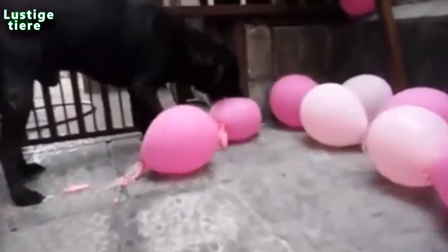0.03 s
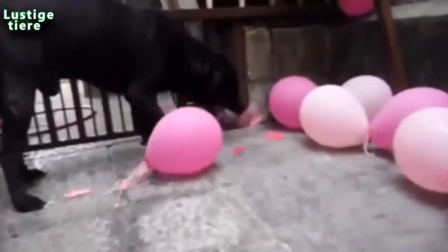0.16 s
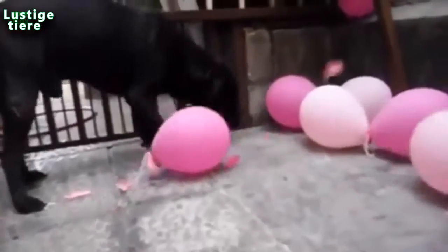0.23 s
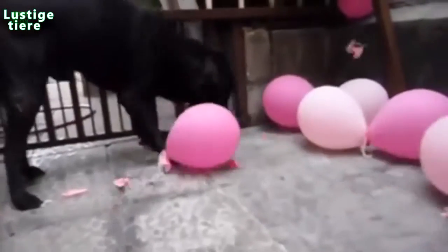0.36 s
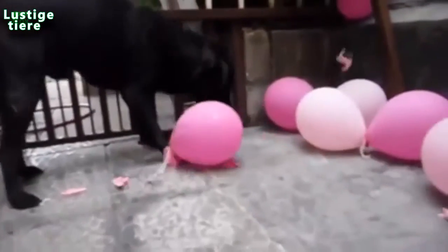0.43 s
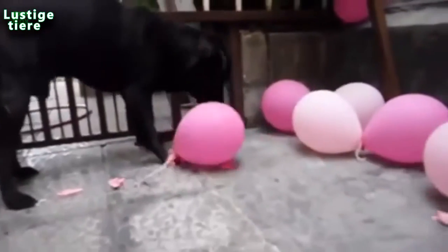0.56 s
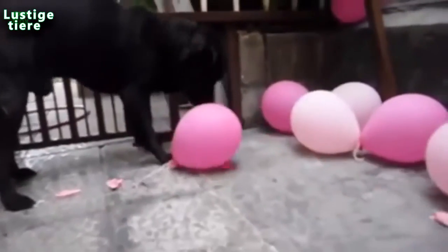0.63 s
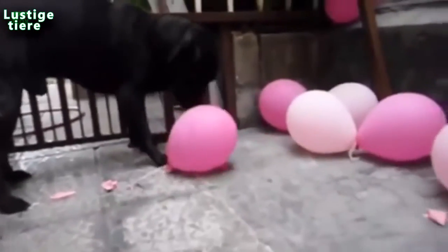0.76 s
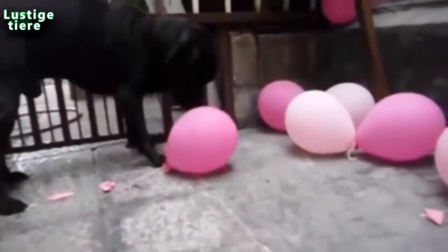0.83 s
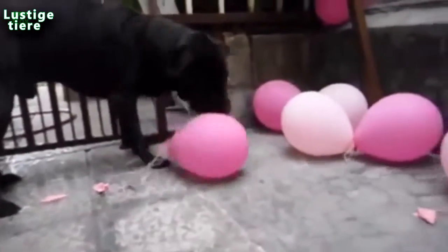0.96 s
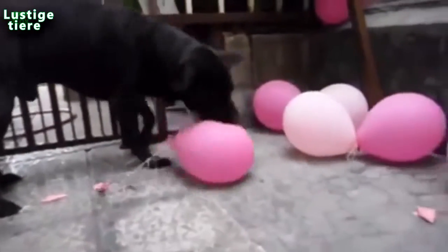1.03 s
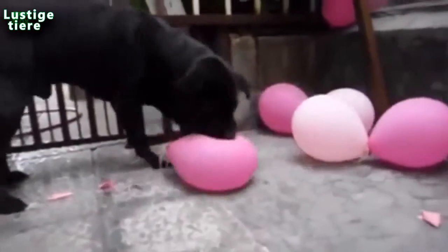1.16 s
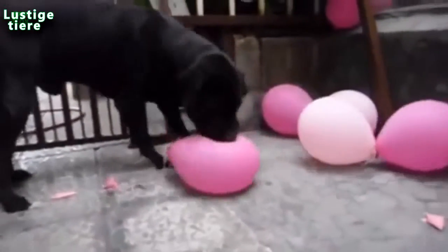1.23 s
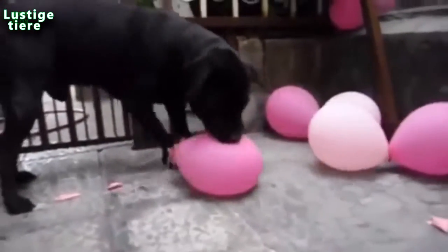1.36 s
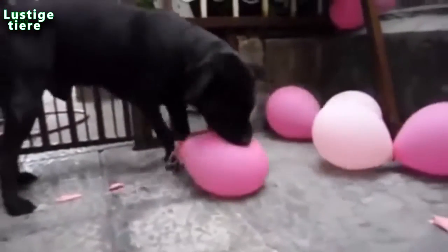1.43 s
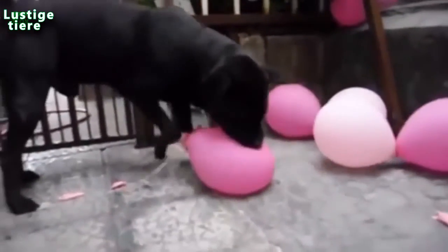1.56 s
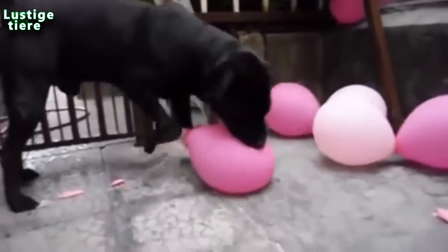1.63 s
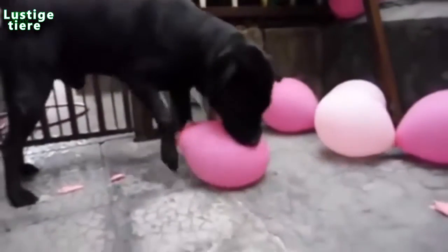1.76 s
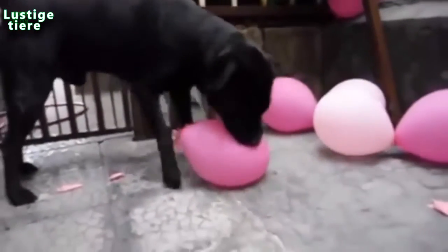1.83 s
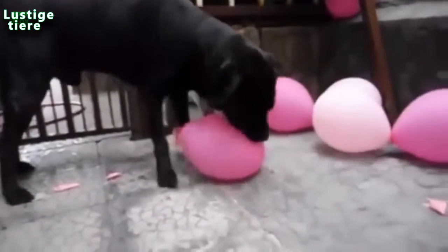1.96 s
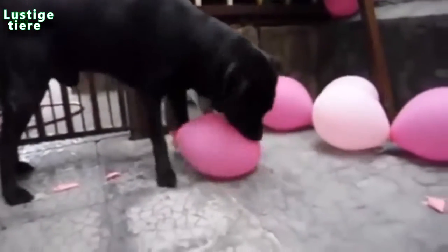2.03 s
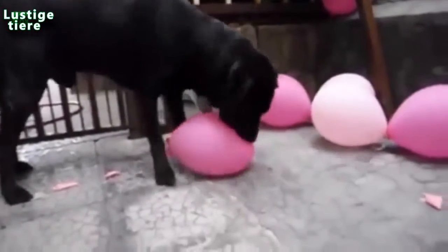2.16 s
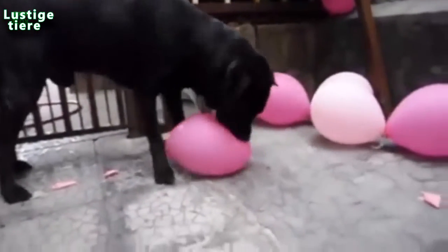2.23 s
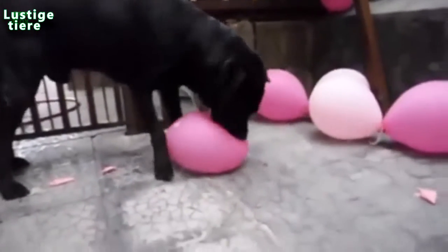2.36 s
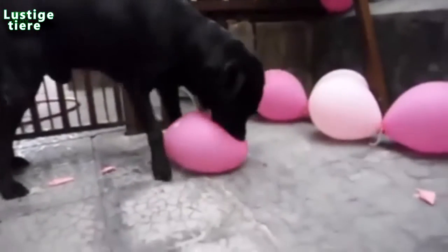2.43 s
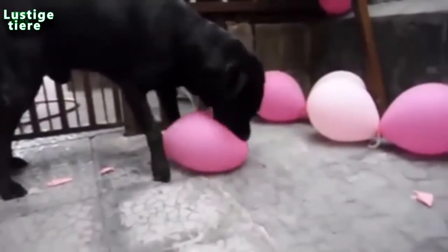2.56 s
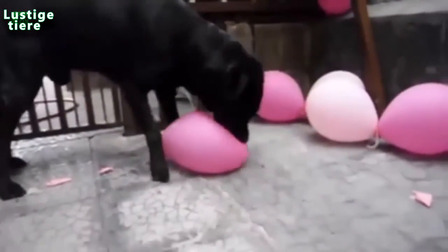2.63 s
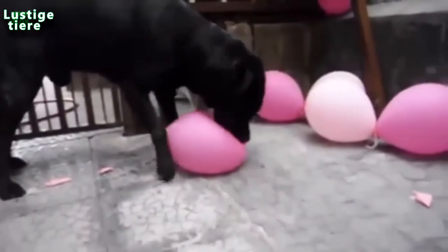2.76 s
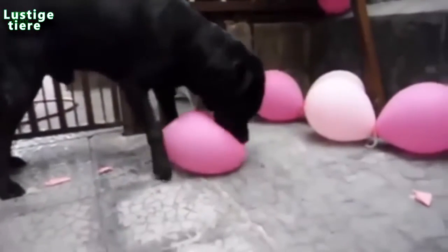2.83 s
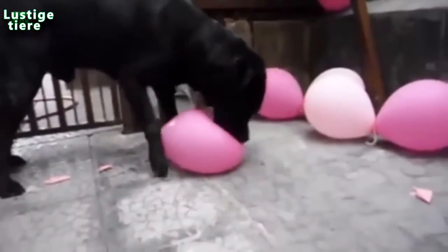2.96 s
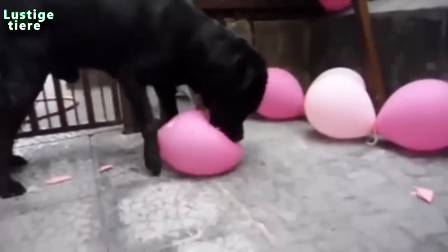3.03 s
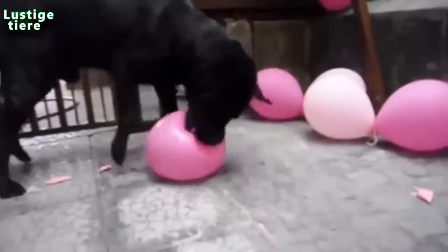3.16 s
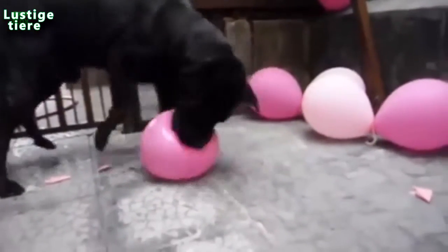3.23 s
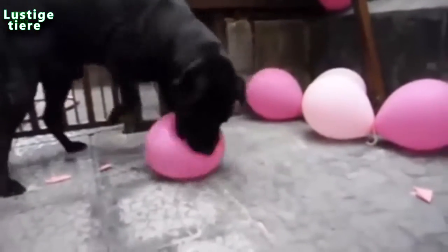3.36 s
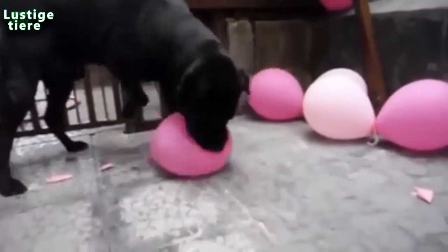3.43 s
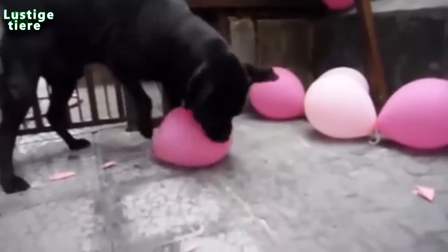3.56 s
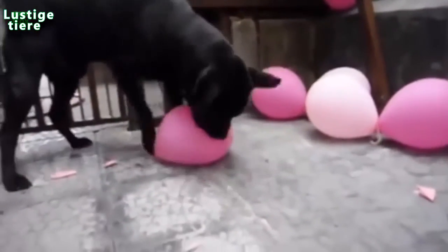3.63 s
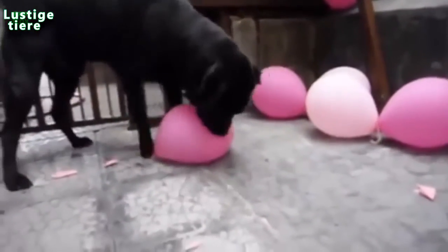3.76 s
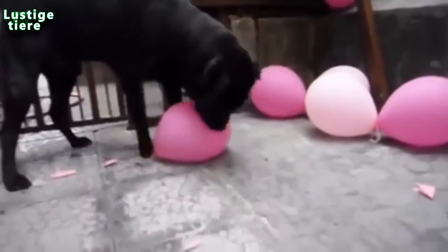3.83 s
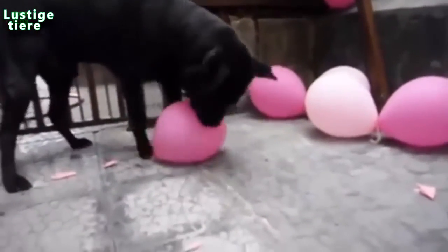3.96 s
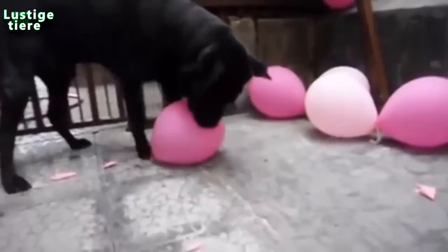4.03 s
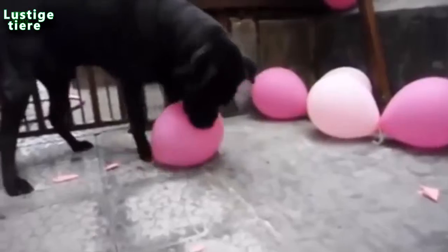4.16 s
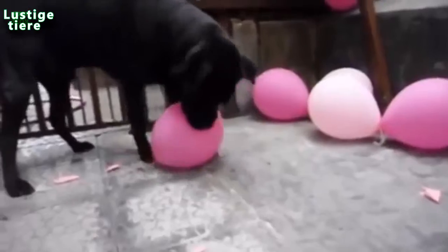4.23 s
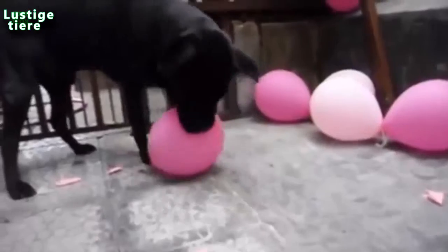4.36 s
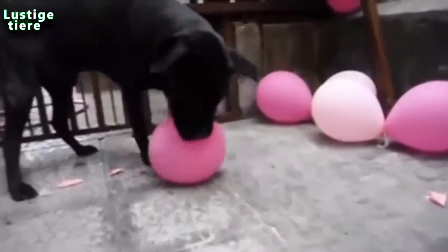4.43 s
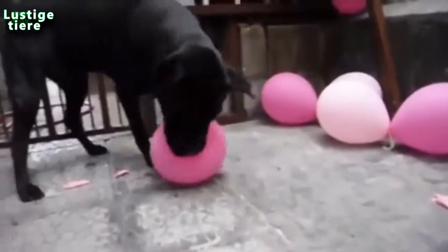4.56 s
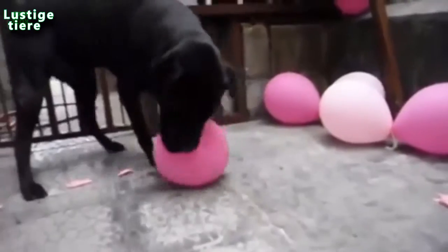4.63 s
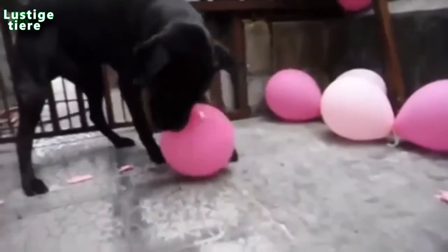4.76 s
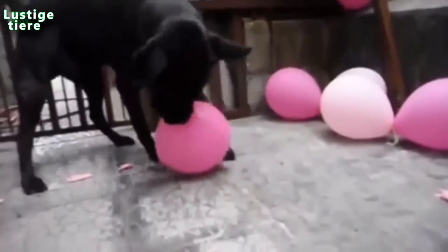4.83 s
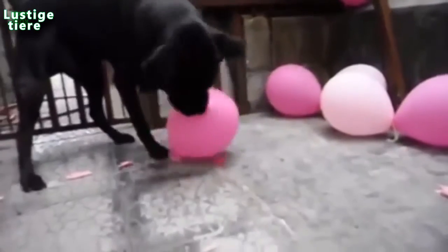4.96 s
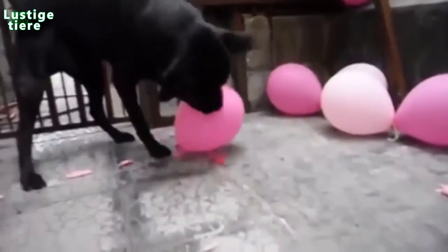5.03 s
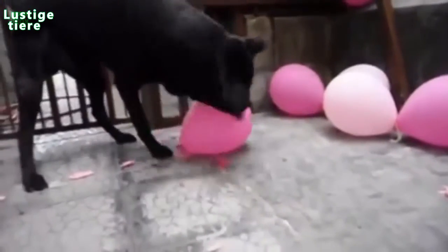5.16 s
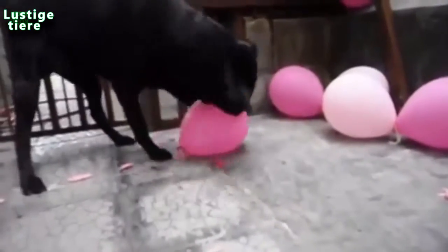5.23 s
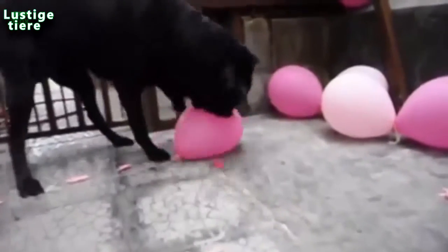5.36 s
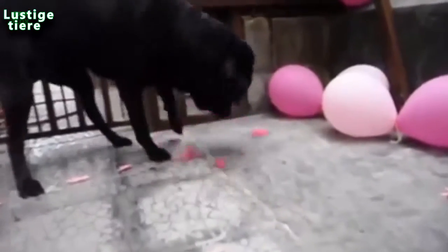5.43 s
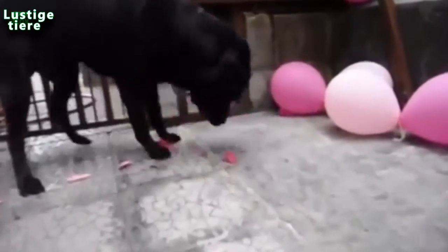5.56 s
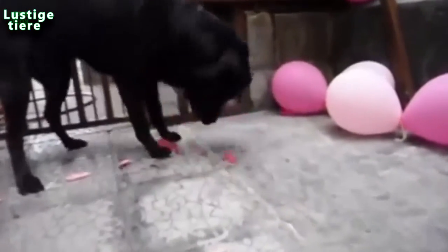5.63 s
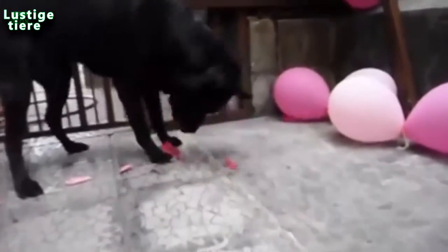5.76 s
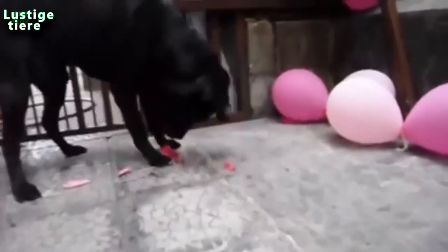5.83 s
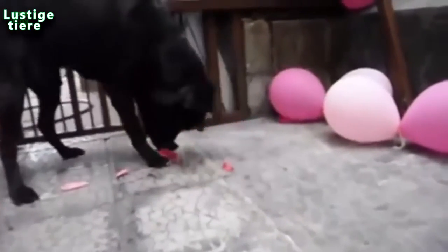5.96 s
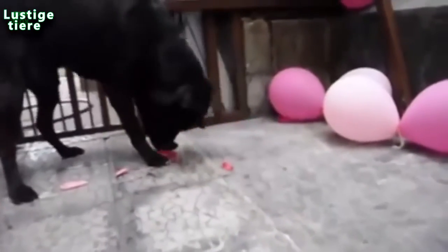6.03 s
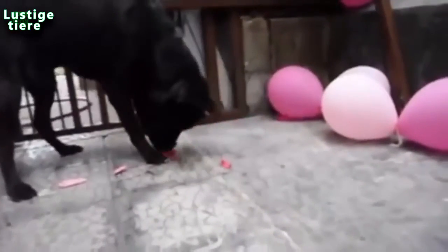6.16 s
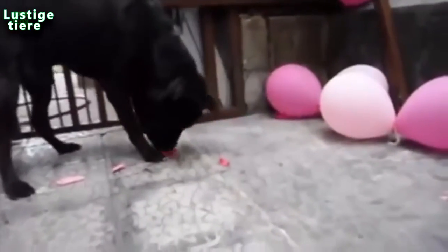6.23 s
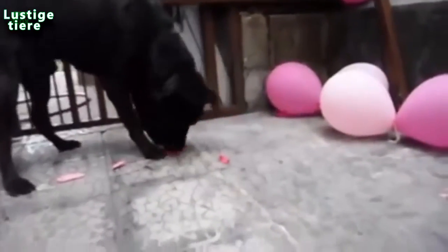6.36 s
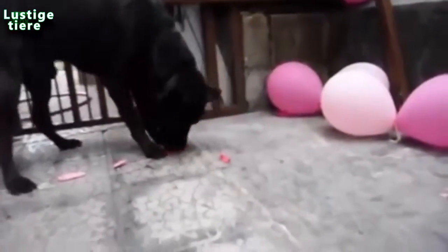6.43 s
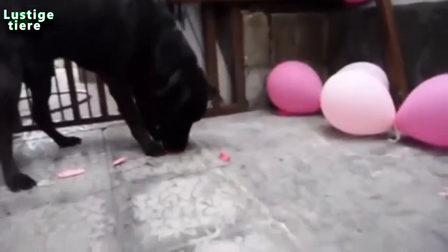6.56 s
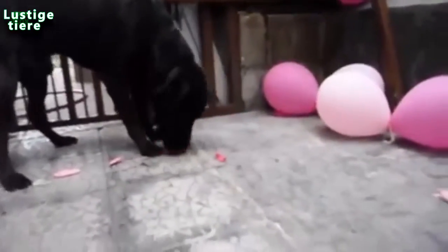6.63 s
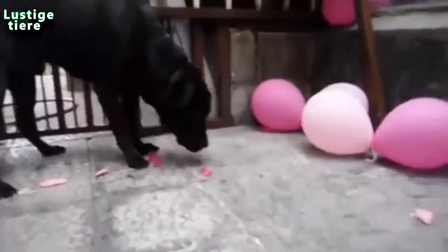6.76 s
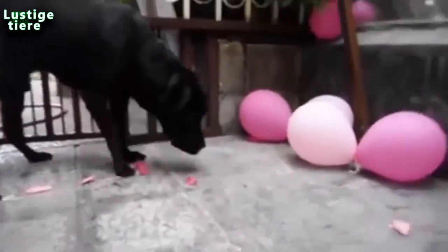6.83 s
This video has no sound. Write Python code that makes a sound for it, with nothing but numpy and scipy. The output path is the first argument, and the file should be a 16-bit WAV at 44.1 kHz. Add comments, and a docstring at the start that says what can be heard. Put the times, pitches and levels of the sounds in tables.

```python
"""Dog chewing party balloons

A dog chews and paws balloons on a walled patio, over a low, slightly wavering hum.
Teeth stick and slip on the latex: slow slips creak and ring the balloon, fast ones squeak;
twice the skin snaps back. Fur hisses and the muzzle rubs over the latex.
Two balloons burst; each blast overloads the microphone and dies away between the walls."""
import sys
import numpy as np
from scipy import signal
from scipy.fft import rfft, irfft
from scipy.io import wavfile

SR = 44100
rng = np.random.default_rng(int(sys.argv[2]) if len(sys.argv) > 2 else 0)


def persist_wave(psi):
    """Save psi, clipped to +-1, as 16-bit WAV."""
    counts = np.round(np.clip(psi, -1, 1) * 32767).astype(np.int16)
    wavfile.write(sys.argv[1], SR, np.atleast_2d(counts).T)


N = 304290
TOP_HZ = 15200  # upper edge of the sound


def undb(db):
    """Decibels to gain."""
    return 10 ** (np.asarray(db) / 20)


def level(x, db, seconds):
    """Scale x so that its energy, spread over the given time, has this rms level."""
    return x * undb(db) / np.sqrt(np.sum(x ** 2) / (seconds * SR) + 1e-20)


def clock(seconds):
    """Sample times from zero."""
    return np.arange(int(seconds * SR)) / SR


def fade(t, t60):
    """Exponential decay that loses 60 dB in t60 seconds."""
    return np.exp(-np.log(1000) * t / t60)


def add(track, s, x):
    """Mix x into the track at time s."""
    i = max(int(s * SR), 0)
    track[i:i + len(x)] += x[:len(track) - i]


def play(track, table, sound):
    """Mix in one sound per table row: its time, then the settings of the sound."""
    for s, *row in table:
        add(track, s, sound(*row))


def colour(x, points, size=2048):
    """Causal (minimum-phase) filter with the given (f/Hz, level/dB) spectrum and unit power gain."""
    hz, db = np.transpose(points)
    f = np.maximum(np.fft.rfftfreq(size, 1 / SR), 1)
    gain_db = np.interp(np.log(f), np.log(hz), db)
    cepstrum = irfft(np.log(undb(gain_db)))
    # fold the cepstrum so that the response starts at once
    cepstrum[1:size // 2] *= 2
    cepstrum[size // 2 + 1:] = 0
    response = irfft(np.exp(rfft(cepstrum)))
    return signal.fftconvolve(x, response / np.linalg.norm(response))[:len(x)]


def band(x, low_hz, high_hz, order=2):
    """Butterworth band-pass."""
    edges = [low_hz, min(high_hz, .49 * SR)]
    return signal.sosfilt(signal.butter(order, edges, "band", fs=SR, output="sos"), x)


def walk(rate, count):
    """Smooth random wander with a spread near 1, heading for a new value `rate` times a second."""
    steps = np.arange(count) * rate / SR
    knots = int(steps[-1]) + 2
    return np.interp(steps, np.arange(knots), rng.standard_normal(knots))


def stroke(t, length, edge, skew=0.76):
    """Contact pressure rises and eases off a little more slowly over one stroke."""
    return np.sin(np.pi * np.clip(t / (length + edge), 0, 1) ** skew)


# resonances of the balloon's skin and the air inside: (f/Hz, t60/s, level/dB)
BALLOON_MODES = [(158, 0.17, -4.5), (230, 0.042, -1), (361.5, 0.085, -2.5), (484, 0.028, 0),
                 (634, 0.033, 5.5), (830, 0.019, 4.5), (1090, 0.067, -0.5), (1368, 0.045, -4.5),
                 (2300, 0.082, -10.5), (3180, 0.015, -6.5)]


def ring(x, modes=BALLOON_MODES, bend=0.05):
    """Drive damped modes (f/Hz, t60/s, level/dB) with x; pitch wanders as the balloon is squeezed."""
    out = 0
    for hz, t60, db in modes:
        wandering_hz = hz * (1 + bend * walk(25, count=len(x)))
        turn = np.exp(2j * np.pi * np.cumsum(wandering_hz) / SR)
        # shift the mode down to 0 Hz, let it decay there, shift it back up
        decay = signal.lfilter([1], [1, -fade(1 / SR, t60)], x / turn)
        out = out + undb(db) * (turn * decay).imag
    return out


# teeth and lips dragging on the latex; a hard tooth rasps, a soft lip hardly does:
# (t/s, length/s, note of the pinched skin f/Hz, body level/dB, rasp level re body/dB)
CREAKS = [(1.353, 0.024, 389, -36, -6), (1.55, 0.046, 397.6, -28, -7), (1.664, 0.034, 336, -30.5, -9),
          (1.744, 0.026, 614, -25.5, -7), (1.833, 0.029, 354.6, -27, -15), (1.839, .036, 1076, -29, -10.5),
          (1.889, 0.03, 385, -32.5, -5), (1.973, 0.03, 378, -30, -11.5), (2.022, 0.058, 678, -41.5, 1),
          (2.061, 0.047, 599, -30, -9), (2.168, 0.058, 355, -28, -11.5), (2.225, 0.066, 1128, -39, -1.5),
          (2.299, 0.013, 681, -36, -2), (2.335, 0.015, 548, -36, -2), (2.477, .016, 650, -30, -6),
          (2.61, .012, 402, -34.5, -13), (2.645, 0.041, 1088, -49.5, 6.5), (2.683, 0.022, 706, -26.5, -7.5),
          (2.774, 0.025, 371.4, -30, -11), (2.886, 0.0082, 660, -30.5, -7.5), (3.075, .012, 693, -34.5, -3),
          (3.202, 0.0068, 342.3, -34.5, -2.5), (3.246, .05, 447, -39, -10), (3.354, 0.065, 190, -27.5, -13),
          (3.415, 0.043, 870, -31, -11.5), (3.457, 0.042, 364.2, -21, -20.5),
          (3.525, 0.04, 1035, -36.5, -12), (3.585, .02, 1063, -40, -7), (3.628, .013, 1057, -40, -6),
          (3.653, 0.014, 378.6, -37, -5), (3.691, 0.057, 299, -45, -2.5), (4.82, 0.04, 693, -48, -6.5),
          (5.357, 0.038, 1094, -48, -3)]
# spectrum of the skin rasping at each slip: (f/Hz, level/dB)
RASP_SPECTRUM = [(700, -24.5), (1500, 7), (3100, 11), (4500, 6.5), (7000, -24.5)]
# spectrum of the fizz above the rasp: (f/Hz, level/dB)
FIZZ_SPECTRUM = [(3000, -23), (5200, 5), (7500, -2), (10000, -9.5), (15000, -14)]


def creak(length, ring_hz, db, bite_db, scatter=.23, uneven_db=3.0, grit=1.2, edge=.007,
          sharp_db=-4, patch_db=-2, swings_per_slip=1.6, fizz_db=-5.5):
    """Stick-slip pulses ring the balloon; each slip also rasps the skin."""
    t = clock(length + .08)
    # the slips come at uneven times and with uneven force
    chance = rng.standard_normal((256, 2))
    gaps = np.exp(scatter * chance[:, 0]) * swings_per_slip / ring_hz
    slips = np.cumsum(gaps)
    slips += .001 - slips[0]
    inside = slips < t[-1]
    pulses = np.zeros(len(t))
    pulses[(slips[inside] * SR).astype(int)] = undb(uneven_db * chance[inside, 1])
    pulses *= stroke(t, length, edge)
    # the whole balloon rings, and the pinched patch has a note of its own
    patch = ring(pulses, [(ring_hz, .035, 0)])
    body = level(ring(pulses), 0, length) + level(patch, patch_db, length)
    # a short puff of grit follows each slip
    puffs = signal.lfilter([1], [1, -fade(1 / SR, .014)], pulses)
    gritty = puffs * rng.standard_normal(len(t))
    skin = level(pulses, 0, length) + grit * level(gritty, 0, length)
    # taut skin next to the tooth pings at pitches that differ with every bite
    ping_hz = np.geomspace(1600, 9000, 6) * np.exp(.15 * rng.standard_normal(6))
    skin += level(ring(skin, [(hz, .02, 0) for hz in ping_hz]), sharp_db, length)
    rasp = level(colour(skin, RASP_SPECTRUM), db + bite_db, length)
    fizz = level(colour(skin, FIZZ_SPECTRUM), db + bite_db + fizz_db, length)
    return level(band(body, 98, 3700), db, length) + rasp + fizz


# fast slips on the latex:
# (t/s, length/s, start f/Hz, end f/Hz, period scatter 0-1, level/dB, brightness/dB)
SQUEAKS = [(1.165, 0.033, 1238, 1224, .08, -41.5, 2), (1.207, .034, 1450, 1412, .1, -44.5, 4.5),
           (1.269, 0.0085, 1850, 1830, 0.11, -38, 3.5), (1.289, 0.041, 1290, 1286, .09, -43.5, 3),
           (1.45, 0.012, 3530, 2920, 0.13, -42.5, 1), (1.503, .04, 1940, 2075, 0.09, -42.5, -0.5),
           (1.85, .04, 1080, 1384, .04, -42, -5), (2.217, .062, 1950, 1277, 0.05, -42, -4),
           (2.418, .05, 1890, 1505, .28, -44.5, -2), (2.534, 0.0046, 3120, 2800, 0.23, -54.5, 13),
           (2.57, 0.009, 1600, 1585, 0.15, -41.5, 5.5), (6.318, 0.024, 3300, 3530, .15, -64, 1)]


def squeak(length, start_hz, end_hz, scatter, db, bright_db, middle_db=0, edge=0.0091,
           flicker_db=4, grit=0.1):
    """Fast, nearly regular slipping: a gliding, trembling sawtooth, with a puff of grit at each slip."""
    t = clock(length + .02)
    glide_hz = np.interp(t, [0, length + edge], [start_hz, end_hz])
    hz = glide_hz * (1 + scatter * walk(3000, count=len(t)))
    turns = np.cumsum(hz) / SR
    saw = np.zeros(len(t))
    for k in range(1, 16):
        flicker = undb(flicker_db * walk(396, count=len(t)))
        audible = k * hz < TOP_HZ
        saw += np.sin(2 * np.pi * k * turns) / k * audible * flicker
    # the grit dwindles from one slip to the next
    saw += grit * (1 - turns % 1) * rng.standard_normal(len(t))
    saw *= np.sqrt(stroke(t, length, edge).clip(0))
    low = level(band(saw, 900, 2400), -bright_db, length)
    middle = level(band(saw, 3200, 4600), middle_db, length)
    high = level(band(saw, 4600, 9200), bright_db, length)
    return undb(db) * (low + middle + high)


# balloons bursting: (t/s, blast level/dB, blast f/Hz, tearing crack level/dB, echo level/dB)
BURSTS = [(0.2319, 18, 184, -7.5, -5), (5.5367, 11, 170.6, -8.5, -5.5)]
# spectrum of the tearing latex: (f/Hz, level/dB)
TEAR_SPECTRUM = [(40, 0), (110, 0.5), (190, 0), (250, -1), (320, 0.5), (600, -1.5), (1100, -8), (2000, -14),
                 (3100, -13), (6000, -17), (10000, -23), (15000, -31)]


def burst(blast_db, blast_hz, crack_db, echo_db):
    """The skin tears with a crack while the air inside is set free as a blast."""
    sound = bang(crack_db, 0.11, echo_db, TEAR_SPECTRUM)
    add(sound, 0, blast(blast_db, blast_hz))
    return sound


def blast(db, hz, t60=0.034, turbulence=1.03, sway_db=-29):
    """The freed air overshoots and swings back with a turbulent gust, then sways on."""
    t = clock(0.54)
    gust = level(band(rng.standard_normal(len(t)), 40, 330), 0, t[-1])
    sway = level(band(rng.standard_normal(len(t)), 27, 90), sway_db, t[-1])
    swing = np.sin(2 * np.pi * hz * t)
    return undb(db) * (swing + turbulence * gust) * fade(t, t60) + sway * fade(t, 0.82)


# stretched skin snapping off a tooth:
# (t/s, crack level/dB, crack t60/s, balloon ring level/dB, thud level/dB, echo level/dB)
SNAPS = [(4.0131, -20, 0.062, -34, -33, -37), (4.5136, -9, 0.088, -26.5, -11.5, -24)]
# spectrum of the snapping skin: (f/Hz, level/dB)
SNAP_SPECTRUM = [(40, -4), (170, -1.5), (600, -12.5), (1300, -9), (2100, -9), (3000, -7), (4500, -13.5),
                 (7500, -10.5), (10000, -20), (15000, -23.5)]
# spectrum of the balloon's thud: (f/Hz, level/dB)
THUD_SPECTRUM = [(40, -13), (110, -2.5), (190, -0.5), (260, -2.5), (350, 0.5), (620, -3), (1300, -9.5),
                 (2200, -27), (5000, -51)]


def snap(db, t60, ring_db, thud_db, echo_db):
    """The skin whips back with a sharp crack; the balloon thuds and its air rings."""
    crack = bang(db, t60, echo_db, SNAP_SPECTRUM)
    thud = bang(0, 0.1, -19, THUD_SPECTRUM)
    ringing = ring(crack, BALLOON_MODES[6:])
    return crack + level(ringing, ring_db, .01) + level(thud, thud_db, .01)


def bang(db, t60, echo_db, spectrum):
    """A short crack of noise together with its wash of reflections, both in one spectrum."""
    echo = patio()
    t = np.arange(len(echo)) / SR
    crack = rng.standard_normal(len(t)) * fade(t, t60)
    return colour(undb(db) * crack + undb(echo_db) * echo, spectrum)


# fur brushing over the latex: (t/s, length/s, level/dB)
SWISHES = [(2.918, 0.029, -53), (3.856, 0.026, -58.5), (4.775, 0.051, -53.5), (4.826, 0.079, -55),
           (5.096, 0.064, -61), (5.351, .05, -50), (5.5, 0.04, -56), (6.73, 0.067, -59)]
# spectrum of the fur's hiss: (f/Hz, level/dB)
FUR_SPECTRUM = [(800, -13), (3000, -1), (6500, 0.5), (10000, -3.5), (15000, -11.5)]


def swish(length, db):
    """Fur slides smoothly over the balloon with a bright hiss."""
    t = clock(length)
    hiss = colour(rng.standard_normal(len(t)), FUR_SPECTRUM)
    return level(hiss * stroke(t, length, 0), db, length)


# the muzzle sliding lightly on latex and stone: (t/s, length/s, level/dB)
RUBS = [(0.0, 0.22, -53.5), (0.487, .22, -62), (1.085, .06, -56.5), (1.156, 0.11, -47), (1.29, 0.13, -50),
        (1.51, .27, -49.5), (1.85, 0.077, -39), (1.95, 0.4, -51), (2.4, 0.29, -54.5), (2.65, .16, -47.5),
        (2.88, 0.43, -57), (3.38, 0.11, -38), (3.52, 0.19, -52), (3.8, 0.41, -63), (4.395, .065, -47.5),
        (4.64, 0.27, -60.5), (5.22, 0.3, -61), (6.32, .1, -67), (6.765, 0.048, -47.5)]
# spectrum of the sliding friction: (f/Hz, level/dB)
BRUSH_SPECTRUM = [(100, -10.5), (400, -9), (1100, -4.5), (2600, -3), (7000, -10), (15000, -20.5)]


def slide(grain_db=2.5, patchy_db=3.5, cavity_db=-5, swell_db_per_s=550.5, ease_db_per_s=352):
    """Grainy friction swells, holds and eases with each rub and keeps the air in the balloon ringing."""
    t = np.arange(N) / SR
    pressures = []
    for s, length, db in RUBS:
        swell = swell_db_per_s * np.maximum(s - t, 0)
        ease = ease_db_per_s * np.maximum(t - s - length, 0)
        pressures.append(db - swell - ease)
    pressure_db = np.max(pressures, axis=0)
    roughness_db = grain_db * walk(900, count=N) + patchy_db * walk(50, count=N)
    grains = rng.standard_normal(N) * undb(roughness_db)
    brush = level(colour(grains, BRUSH_SPECTRUM), 0, N / SR)
    cavity = level(ring(grains, BALLOON_MODES[6:]), cavity_db, N / SR)
    return (brush + cavity + catches()) * undb(pressure_db)


def catches(count=20, length=0.015, catch_db=2, bite_db=-2, low_hz=400, high_hz=1100):
    """Tiny creaks at random moments, where the sliding latex grips briefly."""
    out = np.zeros(N)
    for when, tension in rng.random((count, 2)):
        hz = low_hz + tension * (high_hz - low_hz)
        add(out, when * N / SR, creak(length, hz, catch_db, bite_db))
    return out


# standing waves between the walls: (f/Hz, level/dB)
STANDING_WAVES = [(193, -0.5), (302, 0.5), (338, -5.5), (433, -6), (532, -1.5), (623, -5.5), (848, -10.5)]


def patio(low_t60=0.42, high_t60=0.28, build=0.008, standing_db=-7):
    """Dense reflections off walls and paving, shorter in the treble, with a few standing waves."""
    t = clock(.7)
    edges = np.geomspace(60, 18000, 9)
    t60s = np.linspace(low_t60, high_t60, len(edges) - 1)
    tail = 0
    for lo, hi, t60 in zip(edges, edges[1:], t60s):
        tail = tail + band(rng.standard_normal(len(t)), lo, hi, order=3) * fade(t, t60)
    waves = np.zeros(len(t))
    for hz, db in STANDING_WAVES:
        waves += undb(db) * np.sin(2 * np.pi * (hz * t + rng.random()))
    waves *= fade(t, low_t60)
    # set the standing waves against the middle of the tail
    waves *= undb(standing_db) * np.linalg.norm(band(tail, 150, 1000)) / np.linalg.norm(waves)
    return (tail + waves) * (1 - np.exp(-(t / build) ** 2))


# spectrum of the outdoor air: (f/Hz, level/dB), and its overall level/dB
AIR_SPECTRUM = [(71, -21), (120, -2.5), (180, -10), (269, -10), (387, -14), (514, -15.5), (887, -22),
                (981, -24.5), (1470, -27.5), (5800, -39), (15000, -48.5)]
AIR_DB = -53.5


def background(hum_hz=59.5, hum_db=-36.5, rumble_db=-44.5):
    """A slightly wavering hum, low rumble, outdoor air and a faint thin whine."""
    t = np.arange(N) / SR
    phase = 2 * np.pi * hum_hz * t + 0.22 * walk(8.5, count=N)
    hum = np.sqrt(2) * np.sin(phase) * undb(hum_db + 3.1 * walk(5.4, count=N))
    rumble = level(band(rng.standard_normal(N), 7.4, 80.4, order=3), rumble_db, N / SR)
    air = level(colour(rng.standard_normal(N), AIR_SPECTRUM), AIR_DB, N / SR)
    air *= undb(walk(6.4, count=N))
    whine = level(band(rng.standard_normal(N), 5930, 6050), -78, N / SR)
    return hum + rumble + air + whine


def scene(wet_db=-10):
    """Rubbing, snaps and bursts, each with its echo round the patio, over the background."""
    rubbing = slide()
    play(rubbing, CREAKS, creak)
    play(rubbing, SQUEAKS, squeak)
    play(rubbing, SWISHES, swish)
    walls = patio()
    echo = signal.fftconvolve(rubbing, walls / np.linalg.norm(walls))[:N]
    rubbing += undb(wet_db) * echo
    # snaps and bursts bring their own echo
    bangs = np.zeros(N)
    play(bangs, SNAPS, snap)
    play(bangs, BURSTS, burst)
    return (rubbing + bangs + background())[None]


def record(dry, ceiling=0.53, leak=0.018):
    """The microphone clips nearly flat on the bursts, a little treble riding on top; the highs are cut."""
    clipped = dry / (1 + (dry / ceiling) ** 8) ** (1 / 8)
    clipped = clipped + leak * np.tanh(band(dry, 660, 15000))
    return signal.sosfilt(signal.ellip(8, .2, 70, TOP_HZ, fs=SR, output="sos"), clipped)


dry = scene()
out = record(dry)
persist_wave(out)
```